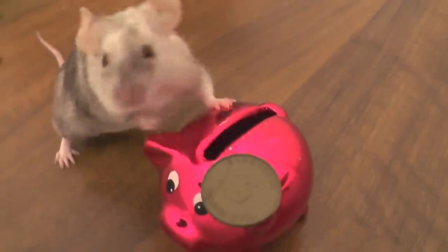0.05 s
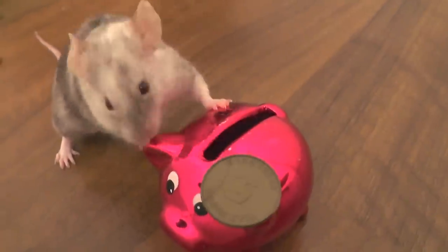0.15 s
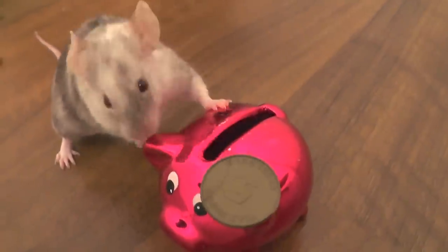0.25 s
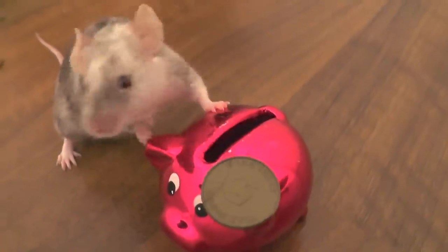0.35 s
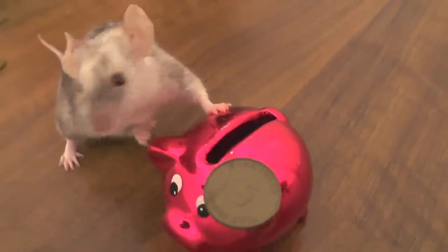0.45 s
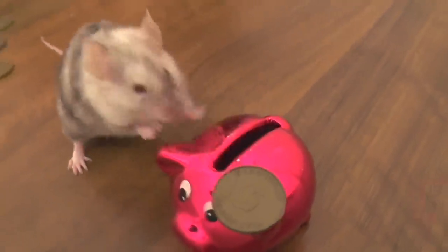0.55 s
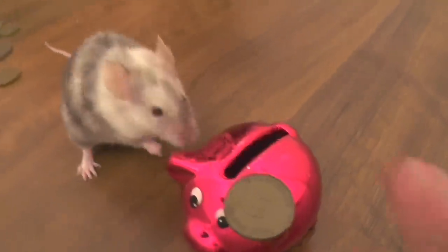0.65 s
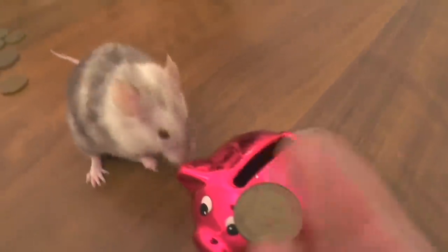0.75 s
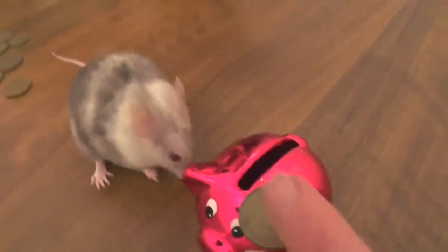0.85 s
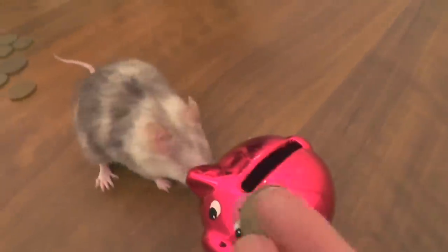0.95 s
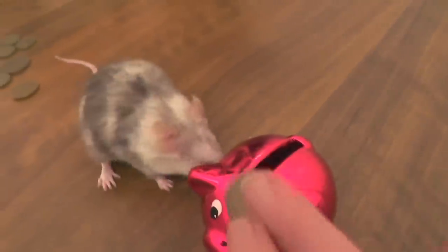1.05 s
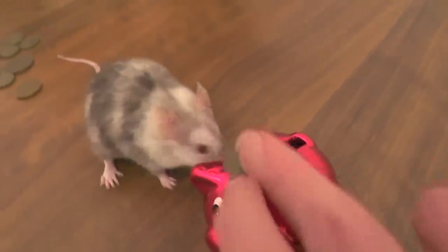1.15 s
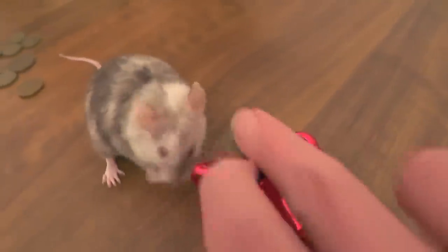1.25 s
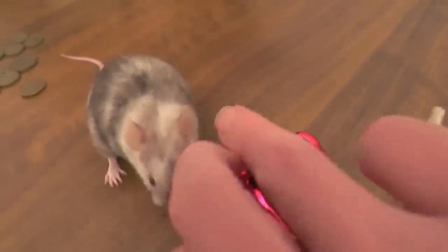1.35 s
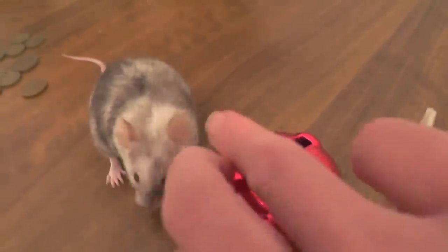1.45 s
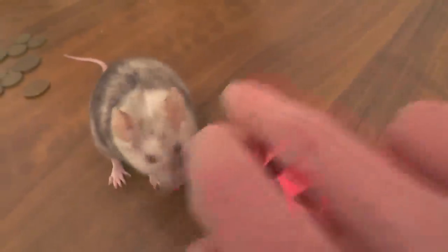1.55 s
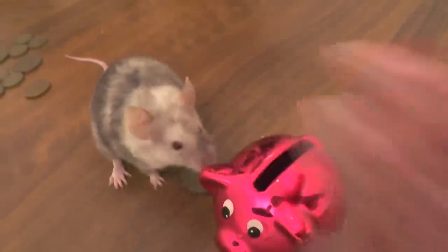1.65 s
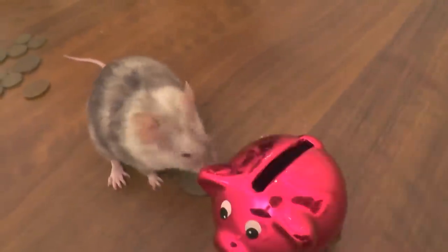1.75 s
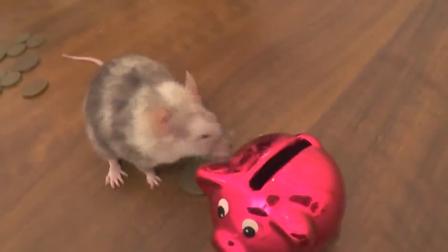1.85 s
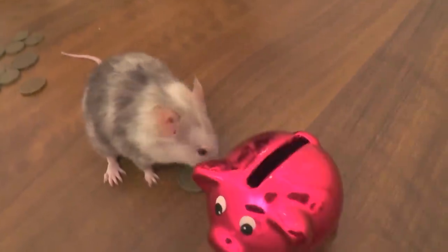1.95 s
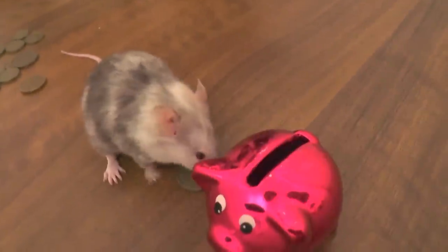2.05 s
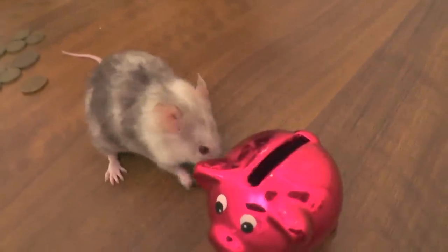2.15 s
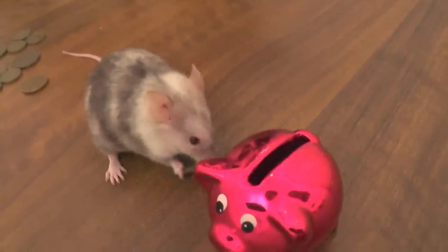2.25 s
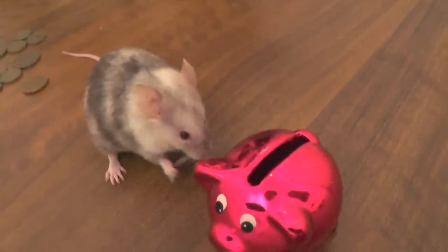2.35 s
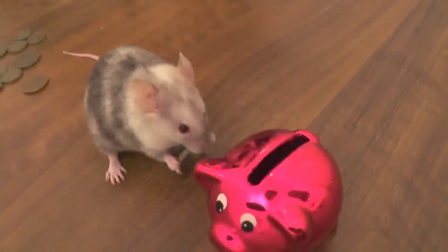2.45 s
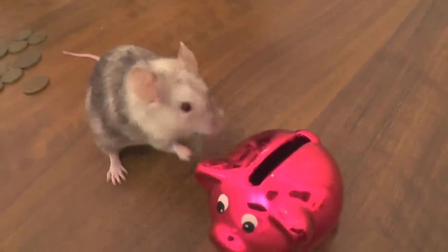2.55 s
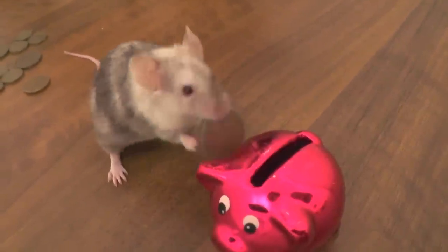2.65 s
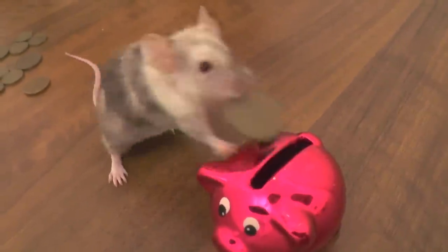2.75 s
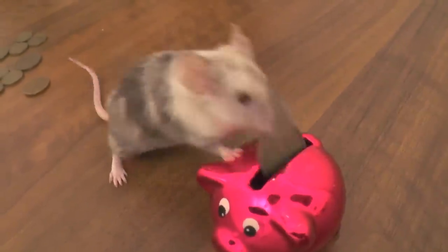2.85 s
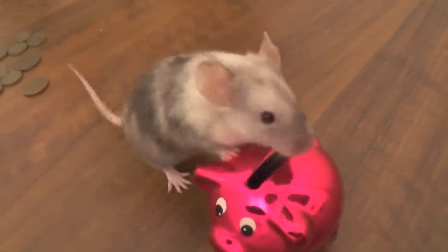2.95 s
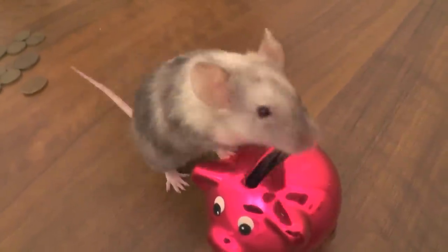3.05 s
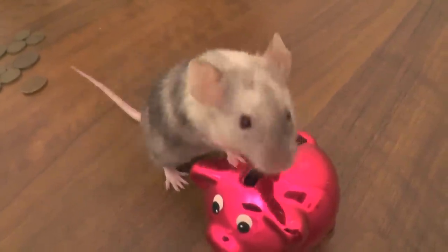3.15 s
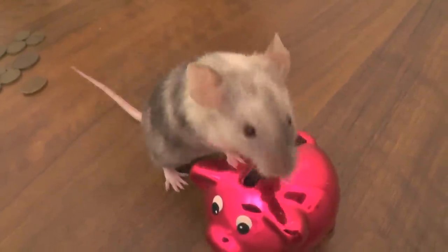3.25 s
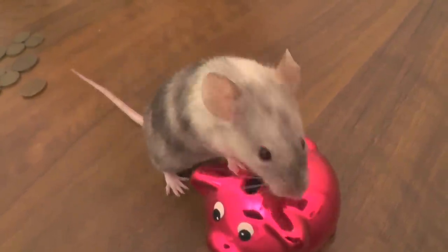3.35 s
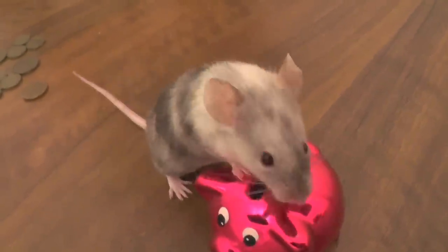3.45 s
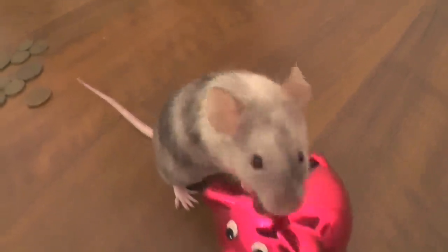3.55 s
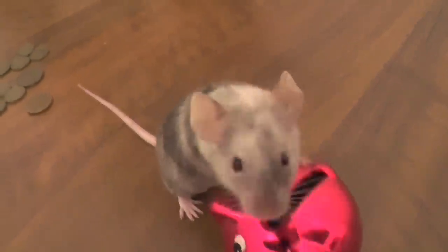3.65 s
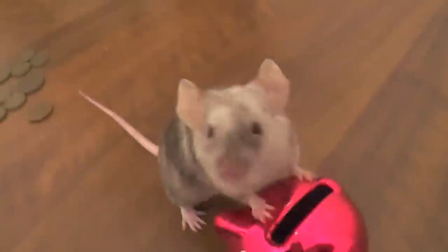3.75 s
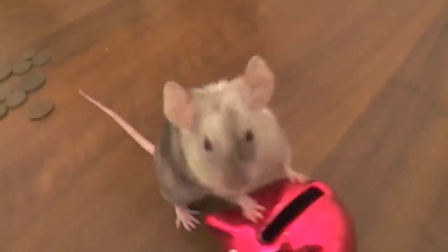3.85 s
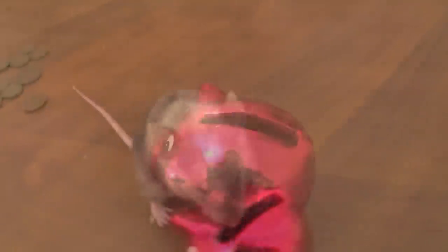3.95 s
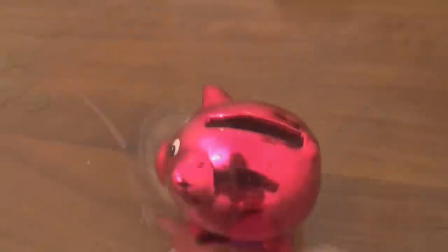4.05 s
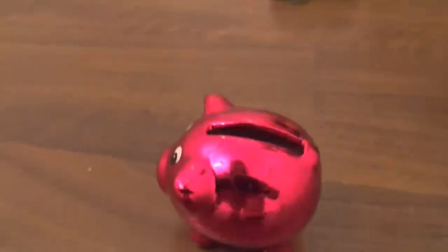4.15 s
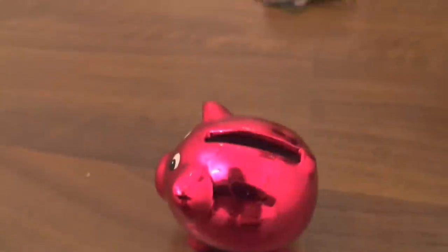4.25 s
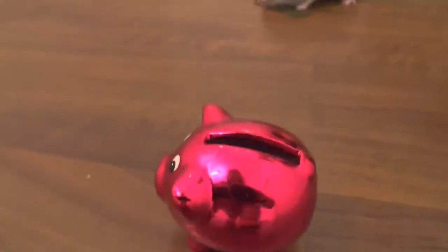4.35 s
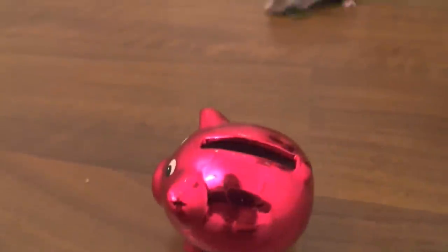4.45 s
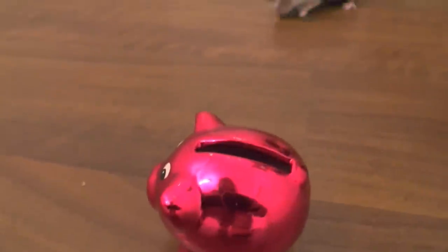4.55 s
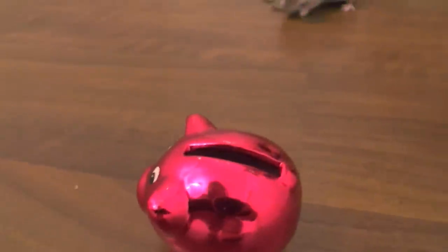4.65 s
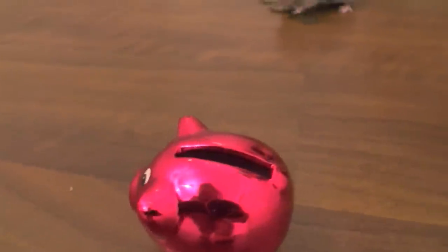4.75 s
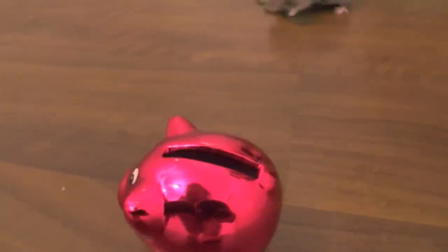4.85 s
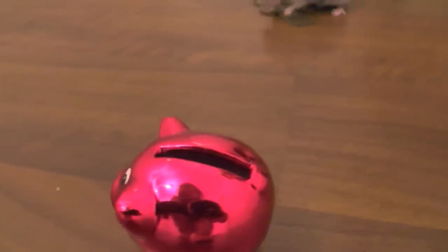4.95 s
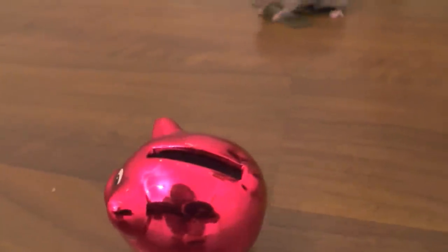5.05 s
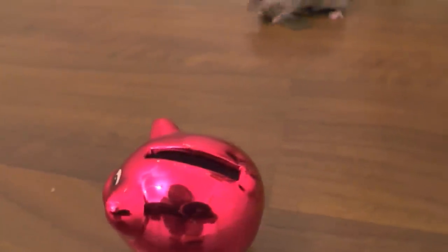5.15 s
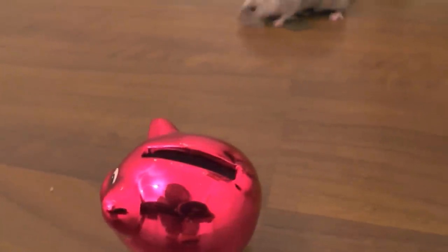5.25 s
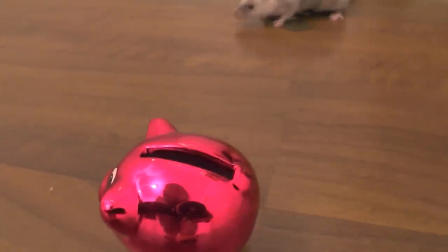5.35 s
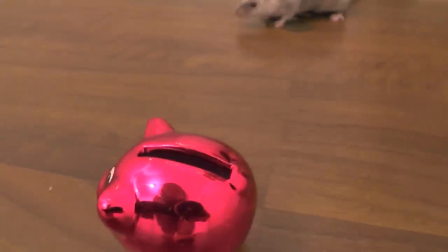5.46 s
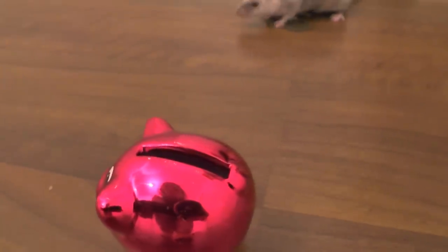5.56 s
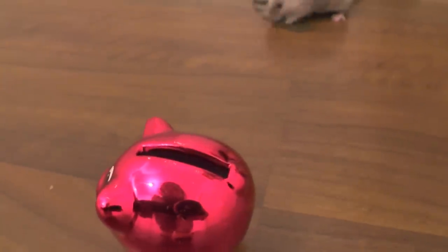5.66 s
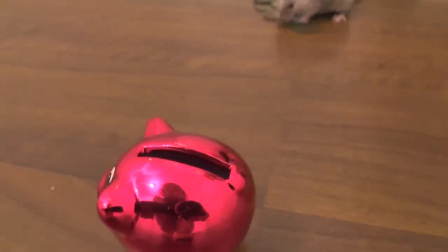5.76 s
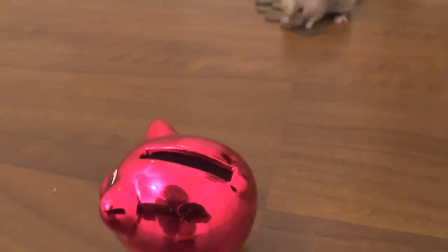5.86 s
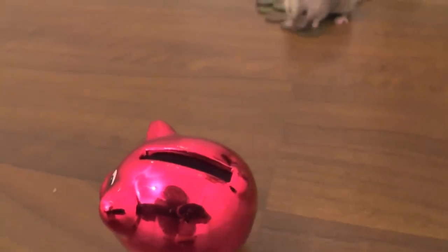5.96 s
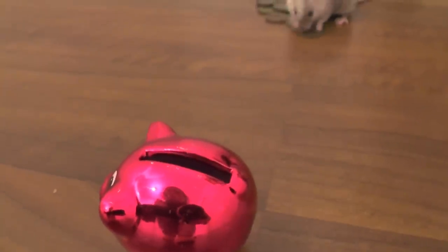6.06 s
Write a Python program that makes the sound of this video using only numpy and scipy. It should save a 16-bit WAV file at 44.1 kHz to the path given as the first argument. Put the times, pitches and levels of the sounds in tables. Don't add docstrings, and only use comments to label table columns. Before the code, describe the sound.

Quiet handling ticks, a bright short coin drop on wood, a hollow knock and loud slot scrape, then faint coin shuffling over hiss and hum.

```python
import sys
import numpy as np
from scipy import signal
from scipy.fft import rfft, irfft
from scipy.io import wavfile
from scipy.ndimage import uniform_filter1d

SR = 44100
rng = np.random.default_rng(int(sys.argv[2]) if len(sys.argv) > 2 else 0)


def wav_out(sig):
    wavfile.write(sys.argv[1], SR, np.round(np.clip(np.atleast_2d(sig).T, -1, 1) * 32767).astype(np.int16))


def field_ratio(decibels):
    return 10 ** (np.asarray(decibels, dtype=float) / 20)


N = 269872

# (time [s], rim ring level [dB], clack level [dB])
KNOCKS = [
    (3.048, -11.5, -14.5),
    (3.0913, -16, -53),
    (3.1015, -20.5, -42.5),
    (3.108, -18, -25),
    (3.1174, -19, -32),
    (3.136, -25, -53),
]


def ring(hz, t60_s, phase, size):
    t = np.arange(size)[:, None] / SR
    return np.sin(2 * np.pi * hz * t + phase) * np.exp(-np.log(1000) * t / t60_s)


def add(track, time_s, sound):
    i = int(time_s * SR)
    track[..., i:i + sound.shape[-1]] += sound[..., :N - i]


def colour(x, table, column=1):
    rows = np.array(table)
    hz = np.maximum(np.arange(len(x) // 2 + 1) * SR / len(x), 1)
    gain_db = np.interp(np.log(hz), np.log(rows[:, 0]), rows[:, column])
    return irfft(rfft(x) * field_ratio(gain_db), len(x))


def stereo(mid, side):
    return np.array([mid + side, mid - side])


def high_pass(x, order, hz):
    return signal.sosfilt(signal.butter(order, hz, "high", fs=SR, output="sos"), x)


def walk(rate_hz):
    hold = int(SR / rate_hz)
    steps = np.repeat(rng.standard_normal(N // hold + 1), hold)
    return 1.3 * uniform_filter1d(uniform_filter1d(steps, hold), hold)[:N]


def strike(hz, t60_s, db):
    t = np.arange(2048) / SR
    onset = 1 - np.exp(-(t * np.mean(hz) / 0.415) ** 2)
    sound = ring(hz, t60_s, 0, size=2048).sum(axis=1) * onset
    return sound * field_ratio(db) / np.abs(sound).max()


def body(force, modes):
    hz, db, t60_s = np.transpose(modes)
    response = ring(hz, t60_s, np.pi * np.arange(len(hz)), size=8192) @ field_ratio(db)
    return signal.fftconvolve(force, response)[:N]


def hiss_and_hum():
    # (frequency [Hz], density [dB per Hz])
    hiss_spectrum = [(20, -27), (45, -0.5), (150, 0.5), (260, -5.5), (480, -3), (700, -8), (1000, -11),
                     (1370, -7.5), (2150, -12.5), (2800, -5.5), (4500, -14), (7700, -19), (11000, -11.5),
                     (15000, -13)]
    # (frequency [Hz], side minus mid [dB])
    hiss_width = [(60, -12.5), (110, -9), (200, -2), (380, -0.5), (700, -2), (1290, -9), (2380, -19.5),
                  (4400, -30), (8120, -5), (15000, -44.5)]
    # (time [s], level [dB])
    hiss_level = [
        (0, -63),
        (1.5, -61.5),
        (3.9, -60.5),
        (4.1, -60.5),
        (6.12, -63),
    ]
    # (frequency [Hz], level [dB])
    hum_lines = [
        (50, -77.5),
        (100.5, -70.5),
        (199.5, -73.5),
        (1373, -78),
    ]
    t = np.arange(N) / SR
    mid, side = (colour(rng.standard_normal(N), hiss_spectrum) for _ in range(2))
    hiss = stereo(mid, colour(side, hiss_width)) / mid.std()
    hiss = hiss * field_ratio(np.interp(t, *np.transpose(hiss_level)))
    hum = np.zeros(N)
    for hz, db in hum_lines:
        level = np.sqrt(2) * field_ratio(db + 0.5 * walk(8.2))
        hum += level * np.sin(2 * np.pi * hz * t + 0.2 * walk(2.83))
    hum_start_s, hum_rise_s = 3.98, 0.017
    return hiss + hum * np.clip((t - hum_start_s) / hum_rise_s, 0, 1)


def jolts():
    # (time [s], left level [dB], right level [dB], length [ms])
    dips = [
        (3.2780, -26, -13.5, 1.15),
        (3.346, -42, -52, 1.6),
        (3.577, -45, -54, 1.6),
        (1.632, -46, -46, 2.),
        (.71, -53, -55, 3.),
        (4.03, -52, -52, 6.),
    ]
    out, t = np.zeros((2, N)), np.arange(-1024, 1024) / SR
    for time_s, left_db, right_db, ms in dips:
        add(out, time_s + t[0], -field_ratio([[left_db], [right_db]]) * np.exp(-.5 * (t * 1000 / ms) ** 2))
    return high_pass(out, 1, 7.)


def room(send):
    # (frequency [Hz], t60 [s], side minus mid [dB], level [dB])
    decay = [(300, 1, -6.5, -5.5), (830, 0.71, -14, 0), (1620, 1.95, -18.5, -6), (1970, 2, -21, -13),
             (3030, 1.64, -20, -9), (4430, 1.03, -19, -0.5), (5610, 0.91, -23, -2.5),
             (8000, 0.75, -15.5, -11), (12200, 0.43, -38, 0.5), (16000, 0.53, -30, -29)]
    rows, t = np.array(decay), np.arange(SR) / SR
    tail = np.zeros((2, SR))
    for hz in 250 * 2 ** np.arange(0, 6.1, 1 / 3):
        t60_s, side_db, db = (np.interp(np.log(hz), np.log(rows[:, 0]), rows[:, k]) for k in (1, 2, 3))
        band = signal.butter(2, [hz / 2 ** (1 / 6), hz * 2 ** (1 / 6)], "band", fs=SR, output="sos")
        noise = signal.sosfilt(band, rng.standard_normal((2, SR)))
        mid, side = noise * np.exp(-np.log(1000) * t / t60_s)
        tail += stereo(mid, side * field_ratio(side_db)) * field_ratio(db)
    tail *= field_ratio(-26) * (1 - np.exp(-(t / 0.0014) ** 2))
    echo_s, echo_db, echo_hz = 0.0034, -13, [2850, 5160]
    smear = rng.standard_normal(400) * np.exp(-np.arange(400) / 70)
    echo_band = signal.butter(2, echo_hz, "band", fs=SR, output="sos")
    add(tail, echo_s, field_ratio(echo_db) * signal.sosfilt(echo_band, smear))
    return signal.fftconvolve(send[None], tail, axes=1)[:, :N]


def slips(hz, t60_s, size):
    slip_now = rng.random(size) < 2000 / SR
    force = slip_now * rng.standard_normal(size) * field_ratio(1.5 * rng.exponential(size=size))
    sound = signal.fftconvolve(force, ring(np.array(hz), t60_s, 0, size=2048).sum(axis=1))[:size]
    return sound / sound.std()


def pressure(strokes):
    rise_share, fade_db = 0.46, 14.5
    t, gain = np.arange(N) / SR, 0
    for time_s, length_s, db in strokes:
        away = np.maximum((time_s - t) / rise_share, (t - time_s) / (1 - rise_share)) / length_s
        gain = gain + field_ratio(db - fade_db * away ** 1.23)
    return gain


def drag():
    # (loudest time [s], length [s], level [dB])
    coin_scrapes = [(.66, 0.13, -62), (1.284, 0.49, -61.5), (3.12, .1, -68), (4.038, 0.13, -52),
                    (4.181, .2, -59.5), (4.539, 0.24, -56.5), (4.712, 0.26, -61.5), (5.019, 0.21, -72),
                    (5.78, .15, -63.5), (6.12, 0.22, -59.5)]
    board_rubs = [(.62, 0.12, -62), (1.3, 0.42, -59.5), (3.19, 0.1, -52), (4.0, 0.12, -62.5),
                  (4.62, 0.56, -61), (5.07, 0.21, -59.5), (5.27, 0.21, -68)]
    hollow_rubs = [(1.28, 0.15, -51.5), (3.17, 0.15, -51), (2.95, .2, -55), (4.03, 0.1, -57.5),
                   (4.68, 0.55, -65.5), (4.97, .15, -68), (5.17, 0.25, -69)]
    # (time [s], frequency [Hz], level [dB], t60 [s])
    nail_ping = (.71, 5080, -60, .3)
    out = slips([2980, 3610, 4010, 4740, 6110, 7240], .005, N) * pressure(coin_scrapes)
    out += slips([470, 530, 600], .04, N) * pressure(board_rubs)
    out += slips([1221, 1.1 * 1221], .05, N) * pressure(hollow_rubs)
    time_s, hz, db, t60_s = nail_ping
    pair_hz = hz * np.array([.997, 1.003])
    add(out, time_s, ring(pair_hz, t60_s, 0, size=8192).sum(axis=1) * field_ratio(db))
    return out


def thuds(table, pitch_hz):
    out = np.zeros(N)
    spots_hz = np.array(pitch_hz) * (1 + 0.047 * rng.uniform(-0.91, 1, (len(table), 2)))
    for (time_s, board_db, hollow_db), (board_hz, hollow_hz) in zip(table, spots_hz):
        board_t60_s = 0.036 / (1 + ((board_hz - 520) / 250) ** 2)
        hollow_t60_s = 0.029 / (1 + ((hollow_hz - 1270) / 170) ** 2)
        add(out, time_s, strike(board_hz * np.array([.91, 1.09]), board_t60_s, board_db))
        add(out, time_s, strike(np.array([hollow_hz]), hollow_t60_s, hollow_db))
    return high_pass(out, 2, 280.)


def wooden_thuds():
    # (time [s], board level [dB], hollow level [dB])
    handling = [(.1653, -38.5, -57), (1.0523, -47, -69), (1.1011, -51.5, -43.5), (1.1408, -52.5, -46),
                (1.16, -49, -42.5), (1.1765, -42, -55), (1.2054, -44, -35.5), (1.2254, -49, -34),
                (1.2421, -46, -31.5), (1.3255, -46.5, -45), (1.348, -55.5, -44), (1.3745, -49, -49),
                (1.4185, -49, -64), (1.5434, -68, -54)]
    on_floor = [(.691, -48, -34.5), (0.6983, -57, -37), (2.3139, -59, -41.5), (2.3274, -57, -41),
                (2.4355, -57, -50.5), (2.4785, -46.5, -46), (2.5119, -50.5, -51.5), (2.559, -56.5, -40.5),
                (2.676, -44.5, -28.5), (2.686, -54, -36)]
    on_bank = [(1.6275, -23.5, -27), (1.6663, -32, -55.5), (2.8654, -18.5, -34.5), (2.912, -36.5, -39),
               (2.929, -39, -40), (3.004, -44, -44.5), (3.0476, -20.5, -21), (3.0905, -32, -34.5),
               (3.1009, -36.5, -24.5), (3.1086, -40, -24), (3.1175, -32, -23.5), (3.136, -37.5, -30),
               (3.2545, -31, -36.5)]
    paws = [(4.2055, -49, -63), (4.4505, -48, -44), (4.4663, -49, -42.5), (4.5135, -44.5, -48),
            (4.802, -62, -50), (4.8967, -44.5, -51), (4.9231, -41, -40), (4.9423, -44, -39),
            (5.1545, -49.5, -53), (5.241, -62, -49), (5.2813, -55, -49), (5.3202, -41.5, -42.5),
            (5.7293, -51, -55), (5.77, -47.5, -47), (5.9065, -53, -72), (5.9815, -51, -50)]
    close_by = [
        (0.698, -47, -36.5),
        (4.0495, -27, -27),
    ]
    # (board pitch [Hz], hollow pitch [Hz])
    pitches = [
        (494, 1190),
        (590, 1640),
        (533, 1358),
        (581, 1090),
        (780, 1040),
    ]
    *wooden, close = (thuds(*pair) for pair in zip((handling, on_floor, on_bank, paws, close_by), pitches))
    return sum(wooden), close


def shell():
    # (frequency [Hz], level [dB], t60 [s])
    wall_modes = [(5290, -7.5, .012), (5880, -2, .008), (6860, -0.5, 0.0083), (7500, -8.5, .008),
                  (8270, -3.5, 0.0089), (9500, -5.5, .01), (10500, -7, .012), (11600, -11, 0.0085),
                  (13020, -10.5, 0.0061), (15000, -8, 0.0045)]
    force = np.zeros(N)
    for time_s, db, *_ in KNOCKS:
        force[int(time_s * SR)] = field_ratio(db - 4)
    return body(force, wall_modes)


def slot():
    # (time [s], peak level [dB], length [ms])
    chatter = [
        (3.2713, -16, .9),
        (3.2755, -6, 1.4),
        (3.2780, -13, 1.2),
        (3.2805, -7, 1.5),
        (3.2864, -17, .4),
    ]
    # (frequency [Hz], level [dB], t60 [s])
    coin_modes = [(2580, -26, .025), (4430, -5.5, .002), (5250, -9.5, 0.0042), (6300, -1.5, 0.0049),
                  (6870, 6.5, 0.0038), (7430, 6.5, 0.0023), (8300, -8, .002), (9180, -9, 0.0024),
                  (9790, -0.5, 0.0027), (11200, -6, .002), (13100, -5.5, .002), (14200, -14, 0.0016),
                  (14550, -7.5, .002)]
    force, t = np.zeros(N), np.arange(-220, 220) / SR
    for time_s, db, ms in chatter:
        burst = np.exp(-(t * 1000 / ms) ** 2) * rng.standard_normal(len(t))
        add(force, time_s + t[0], field_ratio(db - 15.5) * burst)
    clink = body(force, coin_modes) + field_ratio(-15) * np.diff(force, prepend=0)
    return high_pass(clink, 2, 1900.)


def taps(table, clack_hz, crack_db, wet_db):
    # (frequency [Hz, or share of clack_hz], spread [share], t60 [s], room send [dB])
    parts = [
        (7510, 0.096, 0.0023, -11.5),
        (1.005, 0.15, 0.00091, -10),
        (13570, 0.07, 0.00095, -13),
    ]
    direct, send = np.zeros(N), np.zeros(N)
    chances = rng.uniform(-1, 1, (len(table), len(parts), 1))
    for (time_s, ring_db, clack_db, *edge_db), chance in zip(table, chances):
        levels_db = ring_db, clack_db, ring_db + crack_db + sum(edge_db)
        for (hz, spread, t60_s, send_db), db, c, unit in zip(parts, levels_db, chance, (1, clack_hz, 1)):
            sound = strike(hz * unit * (1 + spread * c), t60_s, db + 3.5)
            add(direct, time_s - .0002, sound)
            add(send, time_s, sound * field_ratio(send_db + wet_db))
    return np.array([direct, send])


def coin_ticks():
    # (time [s], rim ring level [dB], clack level [dB], some hits only: crack above usual [dB])
    fingers = [(.6506, -64, -49), (.6947, -52, -36.5), (0.697, -36, -41.5), (0.7, -55, -31.5),
               (1.101, -48.5, -51), (1.1385, -53.5, -55), (1.1604, -63, -45), (1.2249, -57.5, -49),
               (1.2436, -48, -40.5), (1.5793, -45.5, -46.5), (1.5938, -49, -64)]
    drop_bounces = [
        (1.628, -6.5, -5.5, -1.5),
        (1.6375, -7, -33, -6),
        (1.6573, -11.5, -20.5, -4),
        (1.6668, -9, -13, 7.5),
        (1.6725, -16.5, -23, 9),
        (1.7043, -39, -23, 15),
        (1.716, -30, -40, 8),
    ]
    nudges = [(2.252, -48, -53), (2.2864, -57, -58.5), (2.313, -41, -38), (2.3185, -52.5, -44),
              (2.4428, -51, -45.5), (2.4744, -39.5, -36.5), (2.4795, -42, -33), (2.4913, -40, -39.5),
              (2.5134, -55, -35.5), (2.5374, -44, -38.5), (2.5577, -54.5, -28), (2.6794, -20, -26, 5),
              (2.6871, -28, -37), (2.8126, -48.5, -41.5), (2.8288, -44, -56), (2.866, -51, -31),
              (2.9139, -23, -31, -5), (2.9276, -40, -44), (3.0047, -43, -43.5), (3.2191, -44, -56, -8)]
    pile = [(3.9809, -31.5, -40), (3.984, -35, -31), (3.9858, -44.5, -35), (4.0459, -51, -44),
            (4.2067, -50, -44.5), (4.4514, -49.5, -34), (4.4574, -37, -34), (4.4726, -39, -30.5),
            (4.5008, -57, -35), (4.5125, -52, -43), (4.5386, -36, -32), (4.608, -31, -32.5),
            (4.633, -60, -40), (4.7113, -52, -35.5), (4.8969, -34, -30.5), (4.917, -29.5, -25.5),
            (4.9238, -36.5, -36.5), (4.9429, -26.5, -26), (5.0065, -40, -58), (5.0227, -59, -34),
            (5.301, -39, -34.5), (5.3216, -23, -30), (5.3248, -23.5, -24.5), (5.3269, -50, -35),
            (5.7305, -36.5, -39), (5.7709, -42, -33), (5.8612, -60, -42), (5.9823, -37, -37),
            (6.0835, -56, -45), (6.0983, -63, -40)]
    # (clack pitch [Hz], crack above rim ring [dB], extra room send [dB])
    tick_colours = [
        (3500, -6, -4),
        (4550, -3.5, 2.5),
        (3115, -2.5, 0.3),
        (3610, -8, -.6),
        (3720, -1.5, 6),
    ]
    actions = fingers, drop_bounces, nudges, KNOCKS, pile
    *close, far = (taps(table, *settings) for table, settings in zip(actions, tick_colours))
    return sum(close), far


def scene():
    (near, near_send), (far, far_send) = coin_ticks()
    low, close = wooden_thuds()
    wall, coin, rub = shell(), slot(), drag()
    send = near_send + far_send
    send = send + (low + close * field_ratio(-5.5)) * field_ratio(-14)
    send = send + wall * field_ratio(-12) + coin * field_ratio(-9.5) + rub * field_ratio(-20.5)
    direct = near + far * field_ratio(-3) + low + close + wall + coin + rub
    side = field_ratio(-18) * np.gradient(direct) + field_ratio(-23) * np.roll(low, 22)
    return stereo(direct, side) + room(send) + jolts() + hiss_and_hum()


def top_cut(x):
    return signal.sosfilt(signal.butter(12, 17140, fs=SR, output="sos"), x)


def record(dry):
    # (frequency [Hz], gain [dB])
    port = [(7500, 0), (8700, -2), (10500, 0), (15850, -1), (15950, -32), (17000, -36), (17200, -70)]
    rounded = 0.74 * np.tanh(dry / 0.72)
    heard = np.array([colour(channel, port) for channel in rounded])
    return top_cut(heard)


dry = scene()
out = record(dry)
wav_out(out)
```